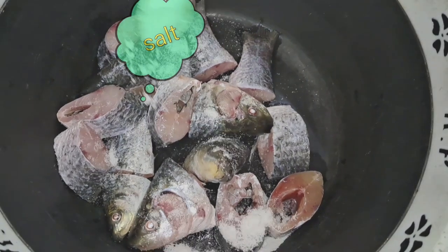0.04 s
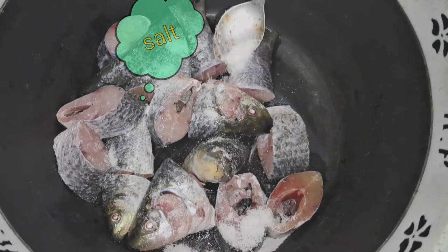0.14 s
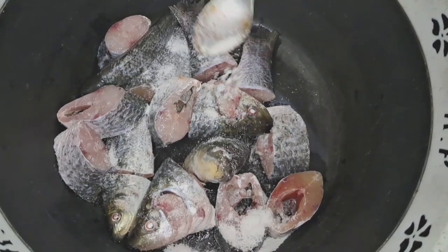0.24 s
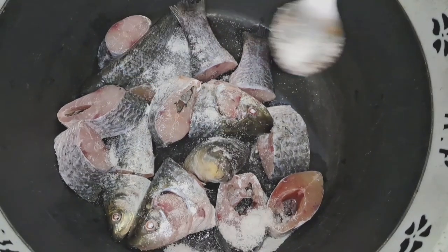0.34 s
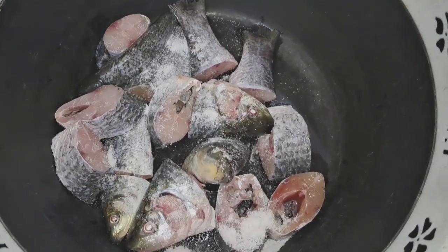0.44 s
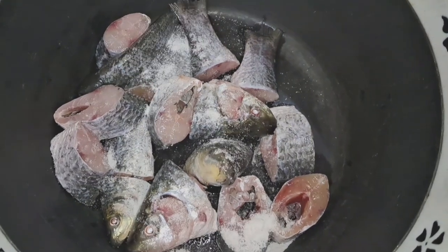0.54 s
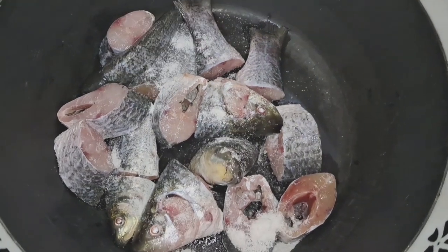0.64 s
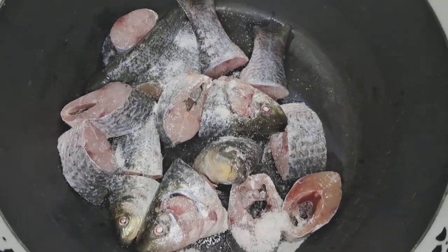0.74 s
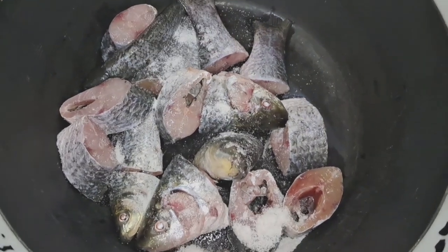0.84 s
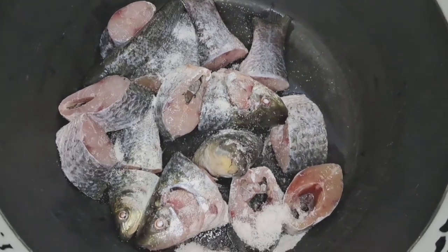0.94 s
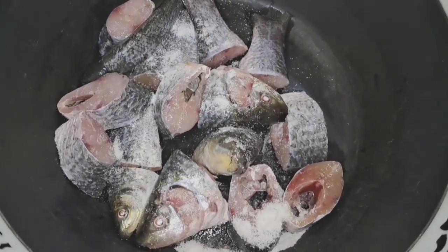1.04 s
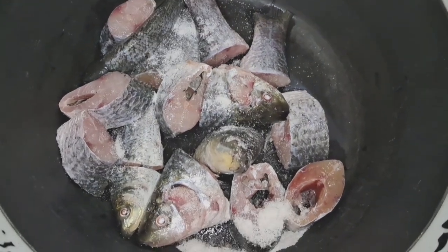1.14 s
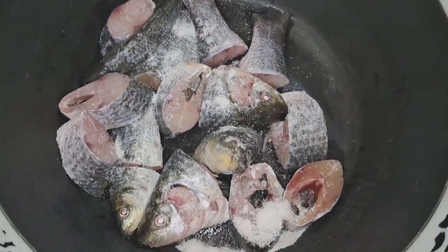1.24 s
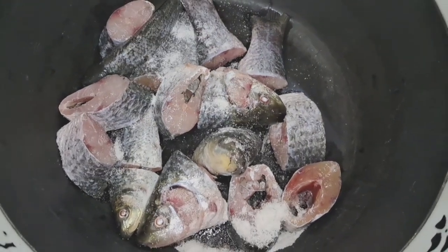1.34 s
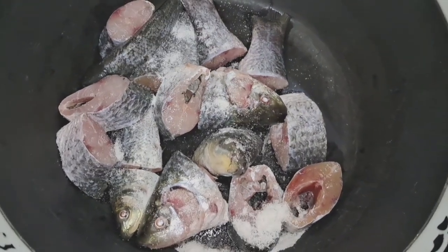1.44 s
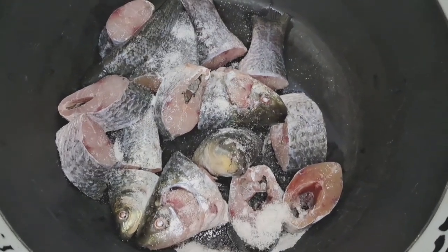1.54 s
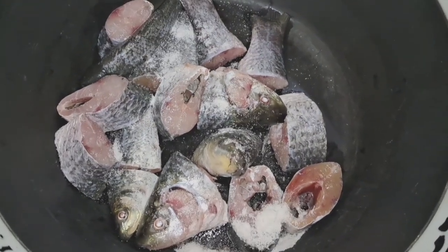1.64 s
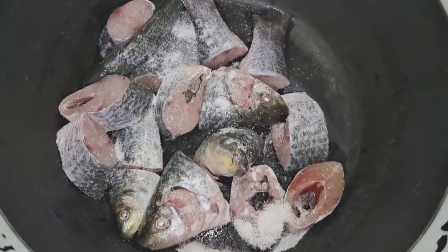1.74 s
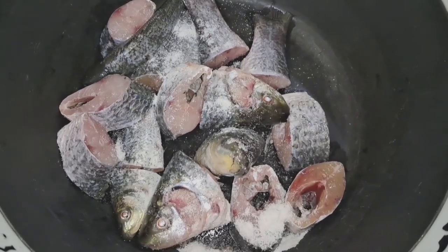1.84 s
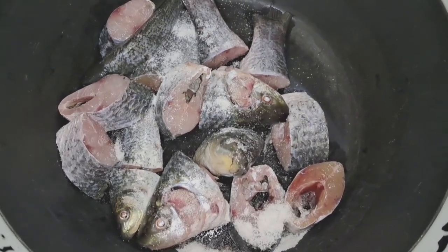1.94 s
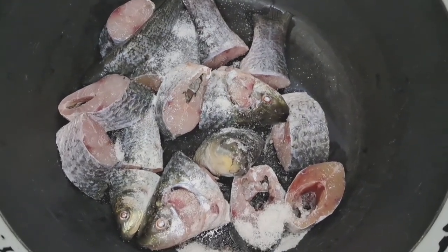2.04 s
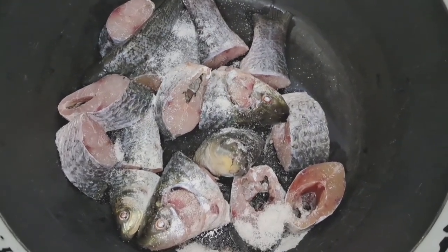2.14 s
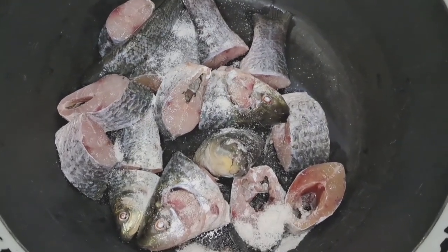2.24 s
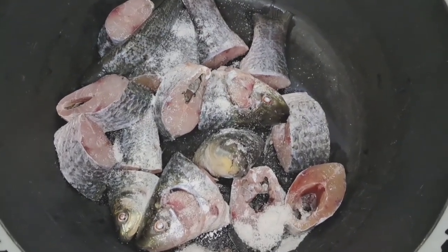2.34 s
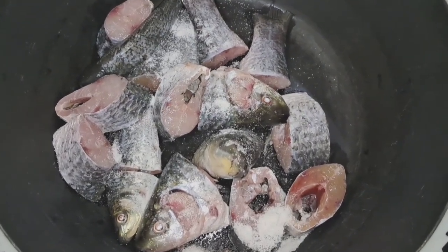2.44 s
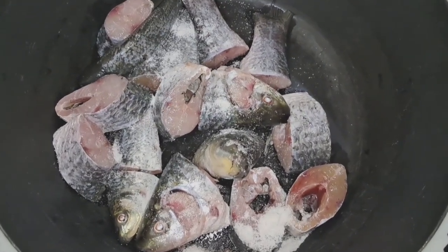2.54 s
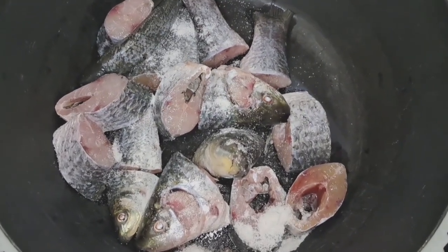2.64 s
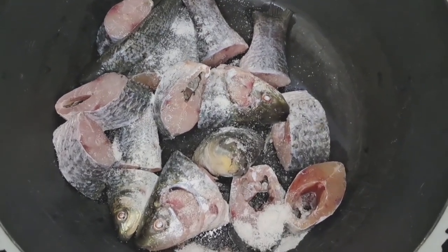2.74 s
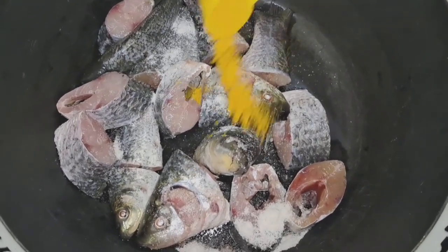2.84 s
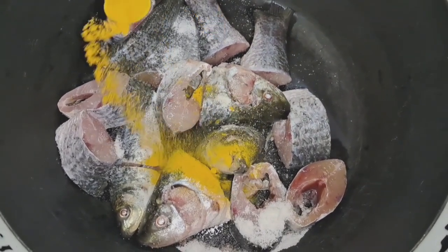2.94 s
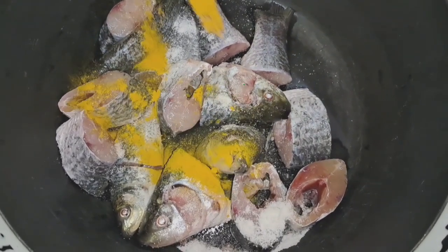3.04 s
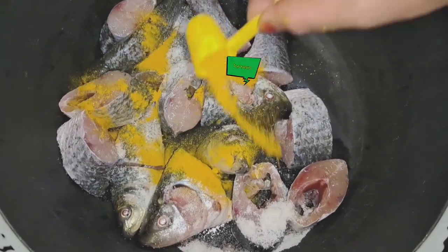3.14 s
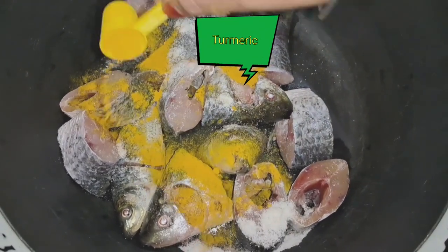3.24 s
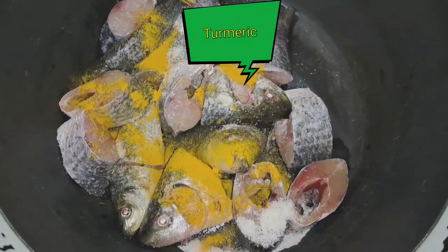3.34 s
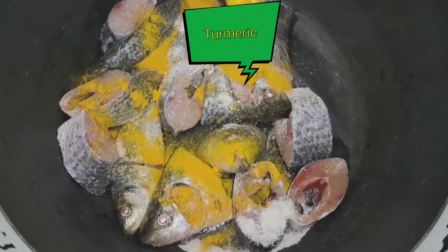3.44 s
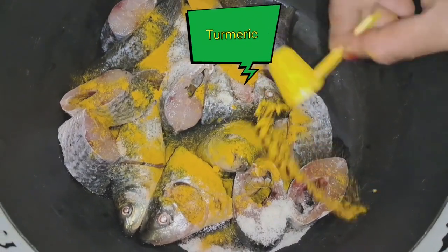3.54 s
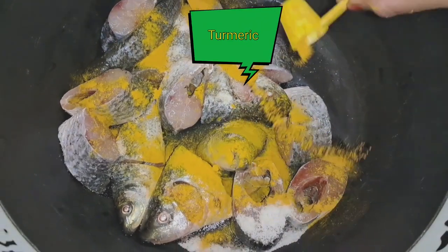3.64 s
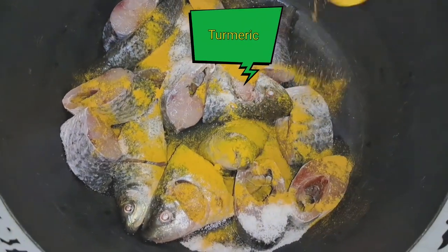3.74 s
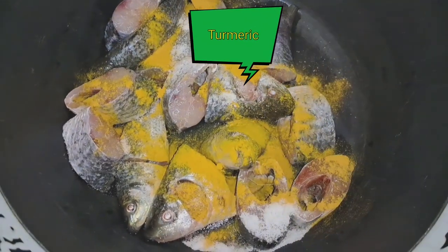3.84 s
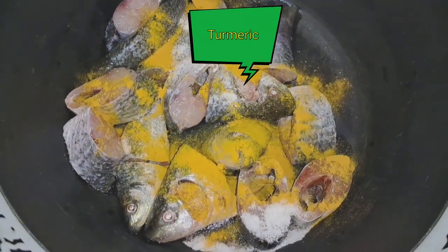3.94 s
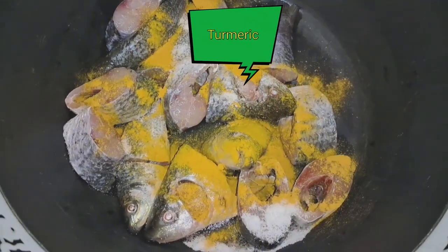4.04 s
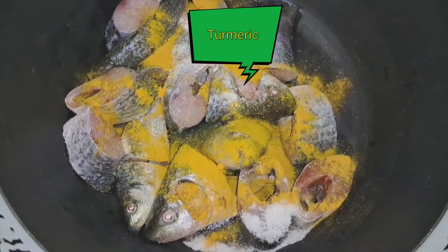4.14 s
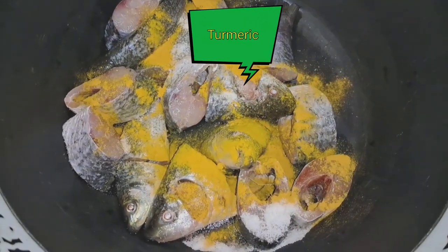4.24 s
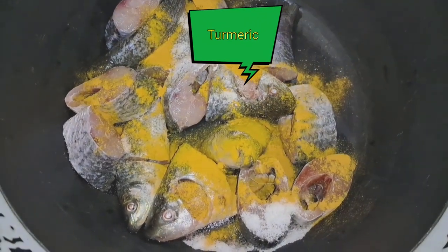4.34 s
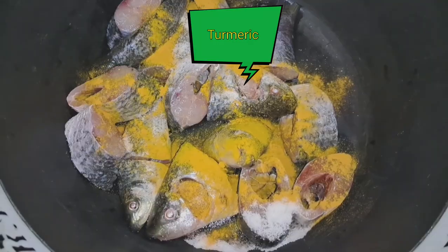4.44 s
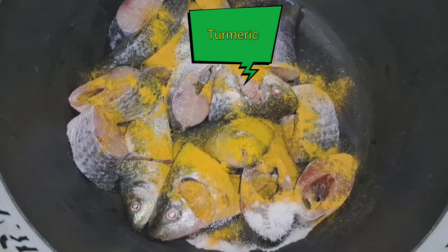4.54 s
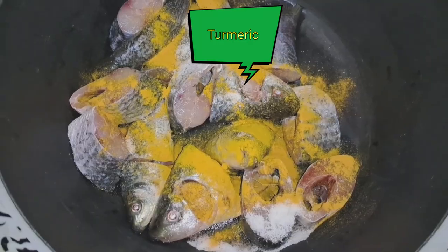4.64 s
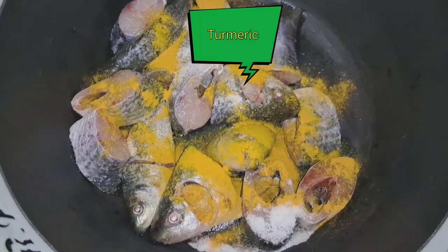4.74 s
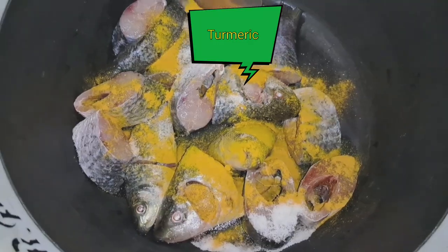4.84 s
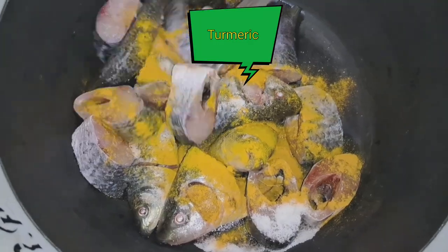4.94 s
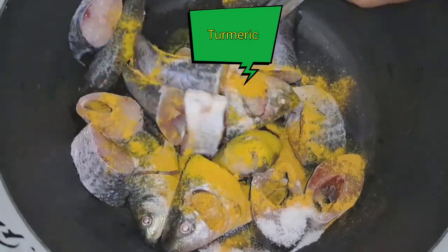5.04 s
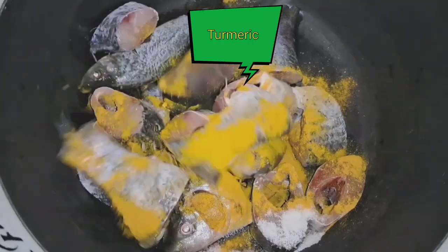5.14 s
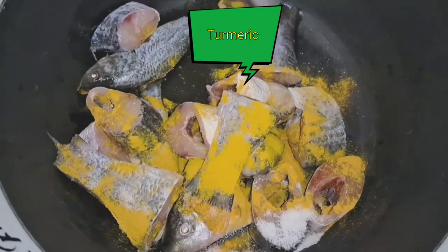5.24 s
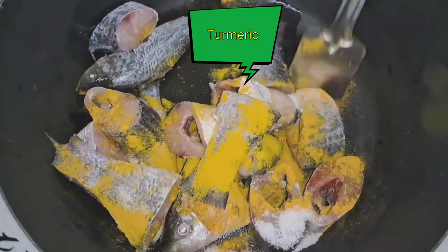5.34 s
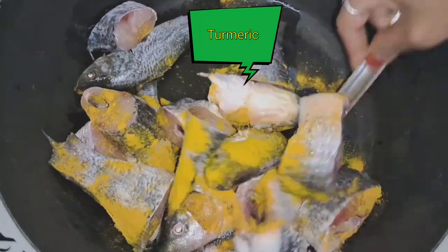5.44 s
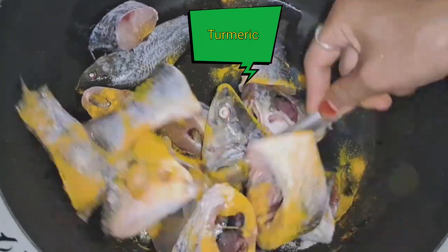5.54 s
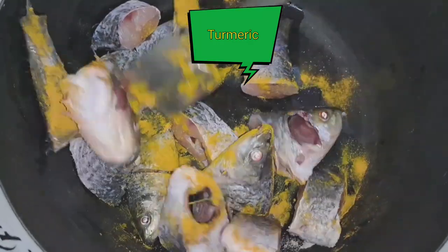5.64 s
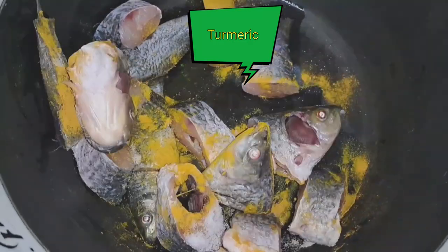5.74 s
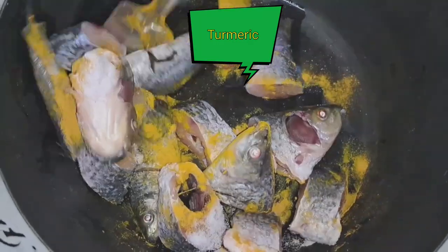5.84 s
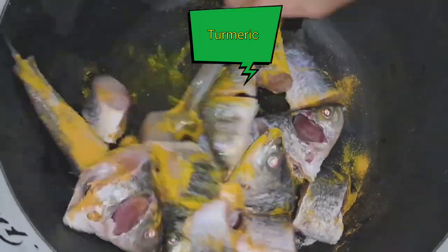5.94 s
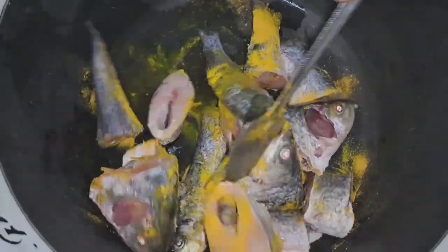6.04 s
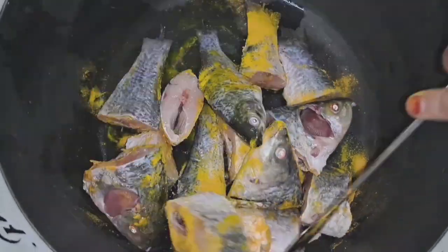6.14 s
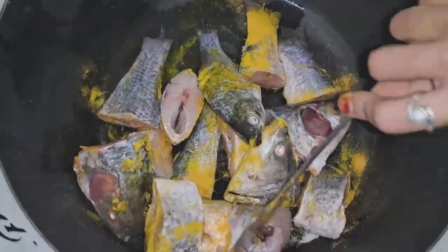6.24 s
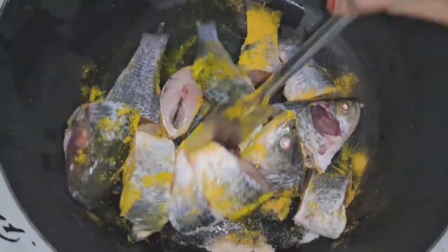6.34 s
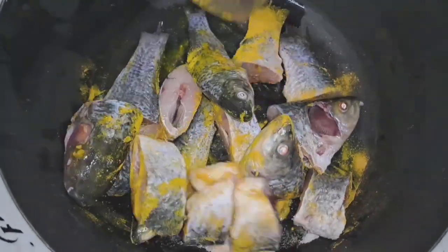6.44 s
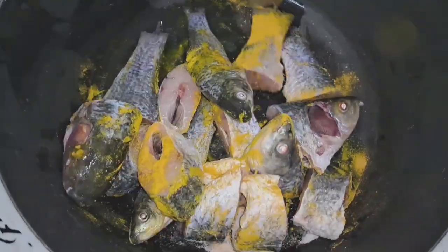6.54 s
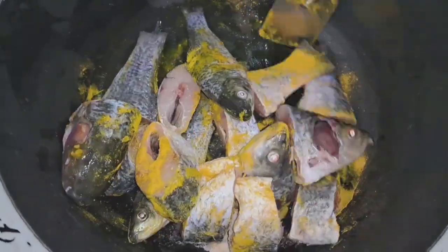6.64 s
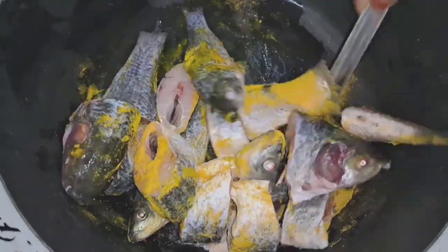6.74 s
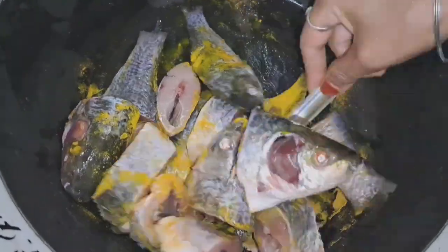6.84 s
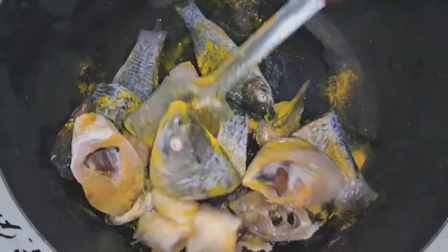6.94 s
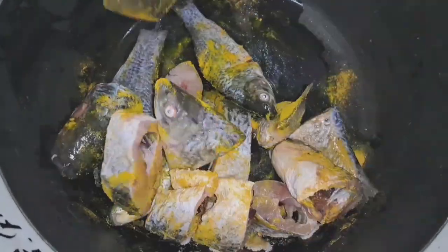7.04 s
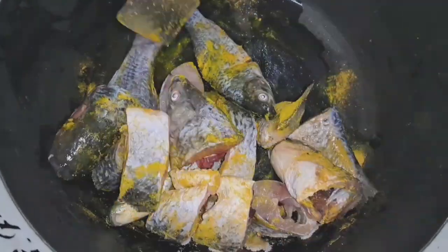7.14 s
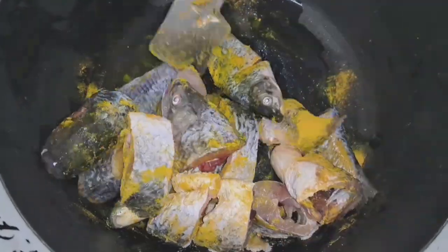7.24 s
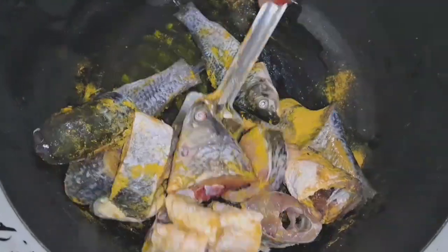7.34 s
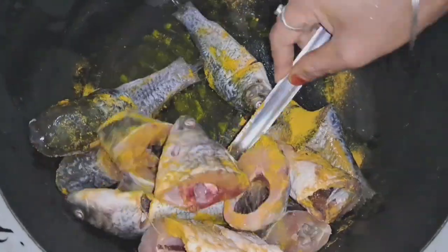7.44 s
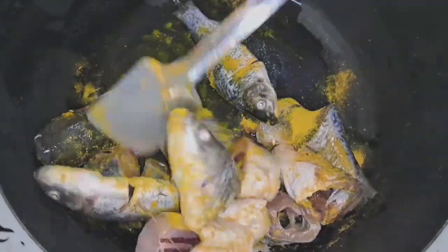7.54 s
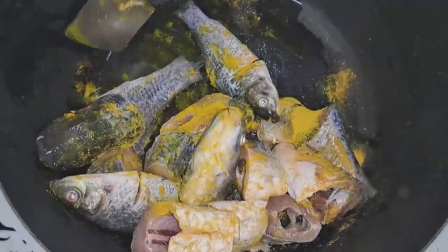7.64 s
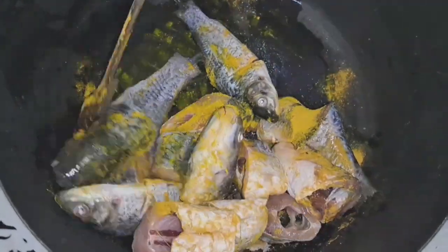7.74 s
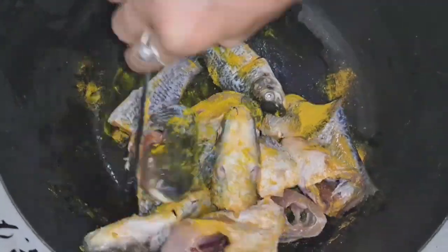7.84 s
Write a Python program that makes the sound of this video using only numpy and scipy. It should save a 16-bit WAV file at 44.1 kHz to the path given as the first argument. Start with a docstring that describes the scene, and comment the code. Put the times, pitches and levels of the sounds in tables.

```python
"""In a kitchen, close up: a metal spatula knocks and scrapes a wok while raw fish pieces flop in it.
Blows are a short dent plus ringing modes (a few are dull thumps of landing pieces), scrapes are random
catches that ring the same modes, short single tones are light touches and one low soft thump,
and dropped pieces are pitch-sagging thuds with wet slaps.
Behind them: steady shaped noise as hiss, thin wavering whistles, two brief spurts and sparse echoes."""
import sys
import numpy as np
from scipy import signal
from scipy.io import wavfile
from scipy.ndimage import uniform_filter1d

SR = 44100
rng = np.random.default_rng(int(sys.argv[2]) if len(sys.argv) > 2 else 0)


def output_pcm(signal):
    """Save a mono or channel-first signal as 16-bit PCM at the path in sys.argv[1].

    Samples are clipped to [-1, 1] before scaling.
    """
    pcm = np.clip(np.atleast_2d(signal).T, -1, 1) * 32767
    wavfile.write(sys.argv[1], SR, np.round(pcm).astype(np.int16))


N = 347985


def gain_of(db):
    """Decibels to amplitude."""
    return 10 ** (np.asarray(db) / 20)


def evened(x):
    """Scales to rms 1."""
    return x / np.sqrt(np.mean(x ** 2) + 1e-20)


def read(points, hz):
    """Reads a table on a log-frequency axis."""
    f, value = np.transpose(points)
    return np.interp(np.log(hz + 1), np.log(f + 1), value)


def add(mix, s, sound):
    """Mixes a two-channel sound in at time s."""
    part = mix[:, round(s * SR):][:, :sound.shape[1]]
    part += sound[:, :part.shape[1]]


def drift(length, rate):
    """Slow chance of rms 1 that changes about rate times a second."""
    knots = rng.standard_normal(int(length / SR * rate) + 2)
    return evened(np.interp(np.arange(length) * rate / SR, np.arange(len(knots)), knots))


# Left-right likeness of noise and echoes. Each row: frequency in Hz, likeness from 0 to 1
# before each sound's own factor.
PORT_LIKENESS = [(40, 0.12), (130, 0.21), (290, 1), (700, 0.91), (1400, 0.92), (2500, 0.093), (5000, 0.057),
                 (15000, 0.033)]


def noise(length, colour, lean, lag_s, patchy_db, likeness=0.95, bands=(), ripple_db=0, size=1024):
    """Two-port noise of rms 1: random short-time spectra in drifting patches, left port slightly early."""
    hz = np.fft.rfftfreq(size, 1 / SR)
    a, b, c, d, patches = rng.standard_normal((4 * length // size + 5, len(hz), 5)).T
    patches = uniform_filter1d(patches, size=size // 100, axis=0)
    patches = evened(uniform_filter1d(patches, size=10240 // size, axis=1))
    same = np.clip(likeness * read(PORT_LIKENESS, hz), 0, 1)[:, None]
    right = a + 1j * b
    early = np.exp(2j * np.pi * hz * lag_s)[:, None]
    left = same * early * right + np.sqrt(1 - same ** 2) * (c + 1j * d)
    z = np.array([left, right])
    side = read(lean, hz)[:, None] / 2
    shape_db = read(colour, hz)
    shape_db += sum(db / (1 + (2 * (hz - f) / width) ** 2) for f, width, db in bands)
    # standing waves of the room
    ripple = evened(uniform_filter1d(rng.standard_normal(len(hz)), size=2))
    shape_db += ripple_db * np.minimum(hz / 500, 1) * ripple
    z *= gain_of(shape_db[:, None] + patchy_db * patches + np.array([side, -side]))
    out = signal.istft(z, nperseg=size, noverlap=3 * size // 4)[1][:, :length]
    return out / np.sqrt(np.mean(out.mean(0) ** 2))


# Balance of the background noise. Each row: frequency in Hz, left over right in dB.
HISS_LEAN = [(60, -1), (120, 0), (240, -2.5), (480, -7), (950, -2), (1890, -1), (3770, -6), (7520, -9),
             (15000, 2)]
# Colour of the steady hiss. Each row: frequency in Hz, relative level in dB per Hz.
HISS_COLOUR = [(30, -27), (75, -28.5), (115, -15.5), (210, -17.5), (480, -12.5), (800, -7), (1150, -3.5),
               (1400, -7.5), (2300, -4), (2800, -6), (4600, -5.5), (7100, -9), (7700, -4), (8600, -14.5),
               (15500, -12)]
# Narrow bands that stand out of the hiss. Each row: centre in Hz, width in Hz, boost in dB.
HISS_BANDS = [(259.6, 34, 9.5), (339.5, 23, 10), (598, 19, 5), (804, 40, 6.5), (953, 70, 4), (1147, 36, 4),
              (1314, 16, 5.5), (1770, 27, 5.5), (2220, 91, 3.5), (2420, 100, 3.5), (3480, 120, 3)]
HISS_DB, HISS_LAG_S = -47, 1.5e-4  # the source stands to the left


def hiss():
    """Steady broadband noise with fixed narrow bands and a slight slow swell."""
    bed = noise(N, HISS_COLOUR, HISS_LEAN, HISS_LAG_S, patchy_db=1.0, bands=HISS_BANDS,
                ripple_db=1.5, size=4096)
    swell_db = .3 * drift(N, 4)
    return gain_of(HISS_DB + swell_db) * bed


# Comb of thin whistles. Each row: centre frequency in Hz, level in dB before the port boosts.
WHISTLES = [(7149, -73), (7262, -68), (7381, -73), (7494, -66), (7612, -66), (7730, -69), (7827, -67),
            (7940, -69), (8430, -79)]


def whistles():
    """Sines that waver in pitch and level, each stronger on the right."""
    out = np.zeros((2, N))
    for hz, db in WHISTLES:
        turns = np.cumsum(hz + 4 * drift(N, 14)) / SR
        slip = np.array([.12 * drift(N, 5), np.zeros(N)])  # the ports slip in and out of step
        level_db = db + 3 * drift(N, 9) + np.array([[1], [7]])
        out += gain_of(level_db) * np.sin(2 * np.pi * (turns + rng.random() + slip))
    return out


# Brief swells of hiss. Each row: time of the top in seconds, level in dB, rise time constant in seconds,
# t60 in seconds, then a colour of frequency in Hz and relative level in dB per Hz.
SPURTS = [(2.17, -47, 0.068, 0.95, [(2500, -18), (5000, -4), (7000, 2), (9500, -8), (13500, -3),
          (15500, -4)]), (4.305, -38.5, 0.006, 0.36, [(2500, -25), (4700, 6), (7000, -6), (9500, -12),
          (13000, -7), (15200, 4)])]


def spurts():
    """Bursts of coloured noise with an exponential rise and fall."""
    out = np.zeros((2, N))
    for s, db, rise, t60, colour in SPURTS:
        u = np.arange(SR) / SR - 4 * rise
        swell = np.where(u < 0, np.exp(u / rise), gain_of(-60 * u / t60))
        puff = noise(SR, colour, HISS_LEAN, HISS_LAG_S, patchy_db=2)
        add(out, s - 4 * rise, gain_of(db) * swell * puff)
    return out


# How long the kitchen echoes. Each row: frequency in Hz, t60 in seconds.
KITCHEN_DECAY = [(100, 0.08), (600, 0.66), (3000, 0.47), (15000, 0.25)]


def kitchen(x):
    """Sparse echoes of random sign, each band dying at its own speed."""
    taps = np.zeros((2, SR // 2))
    at = np.arange(150, SR // 2 - 20, 20) + rng.integers(0, 20, (2, (SR // 2 - 151) // 20))
    np.put_along_axis(taps, at, rng.choice([-1., 1.], at.shape), 1)
    hz, t, z = signal.stft(taps, SR, nperseg=256)
    same = np.clip(read(PORT_LIKENESS, hz), 0, 1)[:, None]
    # echoes around 300 to 1400 Hz are most alike at both ports
    z[0] = same * z[1] + np.sqrt(1 - same ** 2) * z[0]
    decay = gain_of(-60 * t / read(KITCHEN_DECAY, hz)[:, None])
    tail = signal.istft(z * decay, SR, nperseg=256)[1]
    return signal.fftconvolve(x.mean(0)[None], tail / np.linalg.norm(tail[0]), axes=1)[:, :N]


# Balance of the wok sounds. Each row: frequency in Hz, left over right in dB.
WOK_LEAN = [(60, 0), (130, 0), (290, 1.5), (640, -4.5), (1410, 0), (3100, -2), (6820, -8), (15000, 2)]


def ring(hz, db, t60, lag_s):
    """One decaying mode at both ports; lag_s is how much later the right port gets it."""
    t = np.maximum(np.arange(6000) / SR - np.array([[max(-lag_s, 0)], [max(lag_s, 0)]]), 0)
    side = read(WOK_LEAN, hz) / 2
    return gain_of(db + np.array([[side], [-side]]) - 60 * t / t60) * np.sin(2 * np.pi * hz * t)


def dent(hz, db, width, delay):
    """A short bell-shaped wiggle; the left port gets it slightly first."""
    t = np.arange(6000) / SR - delay - np.array([[0], [4e-5]])
    side = read(WOK_LEAN, hz) / 2
    bell = np.exp(-(t / width) ** 2)
    return gain_of(db + np.array([[side], [-side]])) * bell * np.cos(2 * np.pi * hz * t)


def burst(colour, delay, t60):
    """A puff of coloured noise that starts at once after its delay and dies fast."""
    t = np.arange(6000) / SR - delay
    puff = noise(6000, colour, WOK_LEAN, 6e-5, patchy_db=2, size=256)
    return (t > 0) * gain_of(-60 * np.maximum(t, 0) / t60) * puff


# Colour of wet fish sliding. Each row: frequency in Hz, relative level in dB per Hz.
SLIDE_COLOUR = [(40, -36), (90, -23), (160, -19), (260, -22), (380, -17), (600, -58)]


def sliding(length):
    """Lumpy low rub of wet fish on the metal."""
    lumps = gain_of(2.8 * drift(length, 48.0))
    return lumps * noise(length, SLIDE_COLOUR, WOK_LEAN, 8e-5, patchy_db=9.5, likeness=3.2)


# Soft pieces dropping on the metal. Each row: start in seconds, level in dB,
# pitch it sags to in Hz, cycles that set the length of the push.
THUDS = [(4.938, -46, 230, 1.8), (5.099, -49, 245, 2.2), (5.205, -46.5, 258, 2.3),
         (5.292, -38.5, 274, 0.79), (5.325, -48, 406, 2.1), (5.506, -51, 306, 3.3), (5.548, -40, 247, 2.1),
         (5.57, -39, 336, 1.7), (5.652, -36.5, 240, 0.73), (5.721, -35.5, 275, 0.86),
         (5.769, -47, 170, 1.7), (5.97, -35, 240, 1.6), (6.01, -36, 260, 1.1), (6.088, -56, 251, 3.2),
         (6.127, -49, 200, 1.05), (6.627, -56, 250, 4.5), (6.719, -33.5, 268, 1.37), (6.836, -41, 276, 1.6),
         (6.888, -35, 154, 0.93), (6.953, -34, 180, 1), (6.98, -42, 240, 1.4), (7.001, -32.5, 248, 1.8),
         (7.021, -44, 300, 1.1), (7.394, -56, 250, 1.8), (7.157, -33, 302, 2.64), (7.185, -38, 328, 2.8),
         (7.602, -38.5, 270, 1.12), (7.63, -48, 282, 2.3), (7.735, -31, 330, 1.96), (7.786, -47, 274, 4.3),
         (7.879, -42, 322, 2.9)]
# Colour of wet slaps and of the body of a blow. Each row: frequency in Hz, relative level in dB per Hz.
SLAP_COLOUR = [(150, -20), (400, 0), (750, -3), (1500, -10), (4000, -23)]
SLAP_DB, SLAP_T60 = -10.5, 0.072  # dB relative to the thud's level, seconds
SETTLE_DB, SETTLE_T60 = -15, 0.14  # the piece slides on a little: dB relative to the thud, seconds


def thuds():
    """A wet piece lands: a few cycles that sag in pitch as the contact spreads, a slap, a short slide."""
    out = np.zeros((2, N))
    t = np.arange(SR // 4) / SR
    for s, db, hz, cycles in THUDS:
        u = t * hz / max(cycles, .5)
        turns = cycles * (u + 0.37 * (1 - np.exp(-7. * u)))
        push = u * np.exp(1 - 2.7 * u) * 5.06 * np.sin(2 * np.pi * turns)
        settle = np.minimum(u, 1) * gain_of(SETTLE_DB - 60 * t / SETTLE_T60) * sliding(len(t))
        add(out, s, gain_of(db) * (np.array([0.82 * push, 0.9 * push]) + settle))
        add(out, s, gain_of(db + SLAP_DB) * burst(SLAP_COLOUR, 0.00092, SLAP_T60))
    return out


# Short single tones: light touches on the metal, and one low soft thump at 0.527 s.
# Each row: start in seconds, level in dB, frequency in Hz, t60 in seconds.
PINGS = [(0.527, -45, 170, 0.028), (4.82, -32, 2170, 0.074), (4.859, -26, 1450, 0.038),
         (5.059, -32.5, 1450, 0.077), (5.325, -33.5, 1450, 0.031), (5.497, -29, 1490, 0.046),
         (5.498, -30, 1880, .04), (5.603, -32, 1750, .04), (5.571, -38, 500, .04), (5.9, -29, 2780, 0.05),
         (5.608, -39, 1300, .05), (5.646, -40, 2950, 0.046), (6.627, -33, 2670, 0.037),
         (6.629, -36, 1770, .05), (6.702, -34, 2560, .06), (6.72, -31, 6150, 0.087),
         (6.833, -34, 2140, 0.034), (6.589, -32, 1880, 0.062), (6.719, -33, 2700, .05),
         (6.858, -32.5, 1560, 0.036), (6.857, -31, 2070, 0.035), (6.976, -33.5, 2280, .04),
         (7.179, -30, 600, 0.054), (7.19, -38, 3100, 0.074), (7.21, -32, 2930, 0.066),
         (7.228, -32.5, 1474, 0.037), (7.327, -25, 2470, .018), (7.397, -39, 650, 0.044),
         (7.336, -29, 2050, 0.039), (7.335, -27, 3027, .06), (7.365, -34, 2650, .05),
         (7.444, -26.5, 1670, 0.033), (7.626, -32, 1470, 0.03), (7.777, -33, 2300, .04),
         (7.781, -30, 716, 0.051), (7.794, -36, 2250, .05), (7.82, -35, 3260, 0.045),
         (7.838, -37, 1590, 0.087), (7.864, -39, 3450, .08), (7.878, -34, 2700, 0.063),
         (7.879, -39, 3500, .08)]
PING_RISE_S = 0.0012


def pings():
    """One decaying tone each, with a soft start."""
    out = np.zeros((2, N))
    soft_start = 1 - np.exp(-(np.arange(6000) / SR / PING_RISE_S) ** 2)
    for s, db, hz, t60 in PINGS:
        add(out, s, soft_start * ring(hz, db, t60, 6e-5))
    return out


# Blade dragged over the metal. Each row: start in seconds, rise in seconds, hold in seconds, level in dB,
# then bowl boom, gritty hiss and rasp in dB relative to that before the mix trims,
# bowl tone in Hz, blade tone in Hz.
SCRAPES = [(4.813, 0.0041, 0.28, -41, -4, -4, -6, 800, 2300),
           (5.036, 0.026, 0.0093, -40, -9.5, -2, -4, 680, 1700),
           (5.41, 0.0038, 0.2, -39.5, -16, -4, -7, 740, 3040),
           (5.84, 0.0049, 0.16, -41.5, -26, -2, -1.5, 770, 2580),
           (6.077, 0.027, 0.023, -52, -4, -8, -6, 700, 1950),
           (6.571, 0.004, 0.078, -45.5, 4, -5.5, -9, 630, 1950),
           (6.699, 0.032, 0.014, -42, -4, -5.5, -10, 597, 2500),
           (6.763, 0.0025, 0.099, -40.5, -2, -5, -6.5, 730, 2800),
           (6.943, 0.048, 0.013, -45, 2.5, -10, -17, 490, 1960),
           (7.156, .005, 0.067, -41, 0, -15, -5, 503, 2900),
           (7.274, 0.067, 0.017, -38.5, -12, -12.5, 1, 600, 2550),
           (7.37, 0.017, 0.076, -51.5, 1, 2, -12, 640, 2200),
           (7.595, 0.026, 0.013, -48.5, 5, -9, -12, 442, 1700),
           (7.736, 0.0027, 0.075, -42.5, 4.5, -4.5, -4.5, 666, 2220),
           (7.83, 0.049, .03, -37, -11, -10.5, -14, 400, 3260)]
# Modes of bowl, blade and blade edge, before chance detuning.
# Each row: frequency in Hz, relative level in dB, t60 in seconds (a little shorter in scrapes).
BOWL_MODES = [(297, -29, 0.096), (430, -1, 0.05), (477, 15.5, 0.053), (519, 4.5, 0.077), (594, 0, 0.12),
              (630, 7.5, 0.25), (669.4, 4.5, 0.28), (760, 6, 0.09), (807, 8, 0.08), (370, -2, 0.08),
              (901, 5, 0.07), (970, 12, 0.026), (1100, 4, 0.04)]
BLADE_MODES = [(1204, -26, 0.16), (1500, 8, 0.033), (1634, -1, 0.053), (1827, 6, 0.019), (2147, 2.5, 0.032),
               (2350, -17, 0.013), (2583, 2, 0.024), (3050, -11.5, 0.12), (3330, 2, 0.017)]
EDGE_MODES = [(3900, 7, 0.025), (4500, 4, 0.02), (5200, 6, 0.018), (6200, 5, 0.023), (7100, 3, 0.018),
              (8500, 5, 0.014), (10000, 2, 0.012), (12500, 3, 0.01)]
# Colour of gritty metal hiss. Each row: frequency in Hz, relative level in dB per Hz.
GRIT_COLOUR = [(1200, -8), (2500, 2.5), (3600, 0.5), (5000, -1.5), (7200, -2.5), (9000, -7), (13800, -8),
               (15500, -16)]
# A salt crystal cracking. Each row: frequency in Hz, relative level in dB, pulse width in seconds.
SNAP_PULSES = [(3000, -5, .0003), (6000, 2, 0.00017), (11000, -4, .0001)]
SNAP_DB, SLIDE_DB = -6.5, -24  # cracks relative to the grit setting; fish pushed along under the drag
SAG_DB_PER_S, RELEASE_T60 = 33.5, 0.26  # the drag eases while held, then dies (seconds)
JUDDER_DB, EDGE_TONE_HZ = 2.2, 6200  # uneven drag; strongest tone of the edge


def catching(length, per_s, spread_db, most):
    """Catches at random instants, about per_s a second, of random strength."""
    strength = gain_of(spread_db * np.minimum(rng.exponential(1, length), most))
    return strength * (rng.random(length) < per_s / SR)


def dragged_modes(catches, modes, tone_hz):
    """Each catch rings the modes under the moving contact, favouring those near tone_hz."""
    length = len(catches)
    group = 0
    for hz, level, t60 in modes:
        favour_db = 8.8 * np.exp(-(np.log(hz / tone_hz) / 0.24) ** 2)
        drive = catches * gain_of(6.5 * drift(length, 27.0) + favour_db)
        bent_hz = hz * (1 + 0.025 * rng.standard_normal())
        lag_s = 8e-5 + 0.000081 * rng.standard_normal()
        mode = ring(bent_hz, level, 0.92 * t60, lag_s)
        group = group + signal.oaconvolve(drive[None], mode, axes=1)[:, :length]
    return evened(group)


def stroke(start, rise, hold, db, bowl_db, grit_db, rasp_db, bowl_hz, blade_hz):
    """The dragged blade catches on grains of salt and spice, rings the metal, hisses, rasps and cracks."""
    t = np.arange(SR // 2) / SR
    length = len(t)
    held = np.clip(t - rise, 0, hold)
    released = np.maximum(t - rise - hold, 0)
    drag_db = db - SAG_DB_PER_S * held - 60 * released / RELEASE_T60
    drag = np.minimum(t / rise, 1) ** 0.68 * gain_of(drag_db)

    catches = catching(length, 4000, 3.3, 5) * rng.choice([-1., 1.], length)
    out = gain_of(bowl_db - 4.5) * dragged_modes(catches, BOWL_MODES, bowl_hz)
    out += gain_of(-1.5) * dragged_modes(catches, BLADE_MODES, blade_hz)
    out += gain_of(grit_db - 28) * dragged_modes(catches, EDGE_MODES, EDGE_TONE_HZ)

    # the hiss flares where catches bunch up
    bite = evened(uniform_filter1d(abs(catches), size=30) + 0.17) * gain_of(JUDDER_DB * drift(length, 89.0))
    grit = noise(length, GRIT_COLOUR, WOK_LEAN, 8e-5, patchy_db=1.2)
    # the blade rasps about its tone
    band = [(blade_hz / 3.1, -25), (blade_hz / 1.23, -3), (blade_hz, 0),
            (blade_hz * 1.34, -4), (blade_hz * 3.5, -25)]
    rasp = noise(length, band, WOK_LEAN, 8e-5, patchy_db=2.5, size=512)
    out += gain_of(rasp_db) * bite * rasp
    out += gain_of(grit_db + 5.0) * bite * grit
    out += gain_of(SLIDE_DB) * sliding(length)

    coarse = catching(length, 350, 4.5, 4)  # larger salt crystals crack
    snap = sum(dent(hz, level, width, 0.001035) for hz, level, width in SNAP_PULSES)[:, :200]
    cracks = evened(signal.oaconvolve(coarse[None], snap, axes=1)[:, :length])
    out += gain_of(grit_db + SNAP_DB) * cracks
    return start, drag * out


# Hard blows on the wok, and a few dull, barely ringing thumps of landing pieces.
# Each row: start in seconds, blade level in dB, bowl boom in dB relative to the blade,
# edge tick in dB relative to the blade, blade ring in dB relative to the dent, strongest blade tone in Hz,
# bowl ring in dB relative to the dent, strongest bowl tone in Hz.
KNOCKS = [(0.5277, -43.5, 7.5, -10, -26, 1100, -24, 900), (4.812, -13.5, -0.5, -9, -14, 2200, -6, 626),
          (4.8611, -21.5, -7, -4, -6, 1400, -1.5, 910), (4.9914, -29.5, -0.5, 0, -1, 1490, -8, 770),
          (5.0436, -36, -1.5, -14, -4, 1500, 4.5, 705), (5.229, -27.5, -0.5, -15, -10, 1420, -11, 710),
          (5.4098, -19.5, -3.5, -2, -6, 1400, -9, 760), (5.431, -35, -12, 12.5, -2, 1570, -4, 760),
          (5.5078, -31, -2, -6, -2, 2650, -1.5, 765), (5.5477, -40, 5, 8, 5, 1450, 2.5, 534),
          (5.574, -37, 0, 7, -6, 1500, -4, 600), (5.8148, -33.5, -1, 1, 2.5, 1700, -1.5, 760),
          (5.8371, -18, -32, -5, -2, 2330, 2.5, 770), (5.8388, -23, -10, -4.5, -4, 2480, -9, 770),
          (5.8403, -23.5, -27, -6, -8, 1590, -10, 770), (5.903, -26, -33, -5, -2, 2800, 4, 770),
          (6.565, -13, -1, -10, -7, 2250, -7.5, 640), (6.7203, -24, -14, -3, -5.5, 1530, -11, 600),
          (6.7662, -20, -6, -4.5, -9, 1690, -8.5, 734), (6.77, -21.5, -20, 0, -7, 2200, -9, 720),
          (6.833, -20, -8, -24, -16, 1800, -18, 724), (6.9498, -33, 3, -10, -24, 2160, -22, 490),
          (7.001, -25.5, 0, -8, -23, 1800, -26, 490), (7.1567, -15.5, -1.5, -8.5, -7.5, 2200, -17.5, 600),
          (7.3351, -16.5, -15, -10, -13, 2100, -11, 715), (7.3378, -18, -10, -16, -2, 1490, -8, 720),
          (7.3976, -29, -2.5, 7.5, -19, 2180, -14, 640), (7.7341, -20.5, -6, -12, 1, 2130, -6.5, 520),
          (7.774, -40, -10, 12, -12, 2300, -12, 700), (7.878, -38, -6, 8, -10, 2700, -10, 503)]
# First dent of a blow, one list each for bowl, blade and edge.
# Each row: frequency in Hz, relative level in dB, pulse width in seconds, delay in seconds.
DENTS = [
    [(633, -0.5, 0.0012, 0.0016), (1000, -5, 0.0006, 0.0013)],
    [(2530, -0.5, 0.00024, 0.001105)],
    [(4050, -7.5, 0.00018, 0.000768), (6500, -3, 0.00017, 0.000898), (12500, -12, 0.0003, 0.00086)],
]
DETUNE, KNOCK_PAN_DB = .007, 2  # each mode is detuned slightly by chance at every blow; left over right
CHATTER_DB, CHATTER_T60 = -3.5, 0.011  # the blade edge rattles: dB relative to the tick, seconds
BODY_DB, BODY_T60 = -9, .15  # dull noisy body of the blow: dB relative to the bowl ring, seconds


def knock_tail(modes, bowl_hz, blade_hz):
    """All modes of one part ring together; where the blow lands favours some of them."""
    favoured = (bowl_hz, 8, .16), (blade_hz, 5.7, .049), (EDGE_TONE_HZ, 4.5, .049)
    tail = 0
    for hz, level, t60 in modes:
        chance, lag, bend = rng.standard_normal(3)
        favour_db = max(top_db * np.exp(-(np.log(hz / tone_hz) / spread) ** 2)
                        for tone_hz, top_db, spread in favoured)
        mode = ring(hz * (1 + DETUNE * bend), level + favour_db + 2. * chance, t60, 6e-5 + 1e-4 * lag)
        tail = tail + mode * gain_of(5 * drift(6000, 90.0))  # each mode dies away unevenly
    build = 1 - np.exp(-(np.arange(6000) / SR / .003) ** 2)  # builds while the dent spreads
    return tail * build / abs(tail[:, 130:]).max()


def knocks():
    """Each blow is a dent and then a ring of all modes, with edge chatter and a dull noisy body."""
    out = np.zeros((2, N))
    for s, db, bowl_db, edge_db, ring_db, blade_hz, boom_db, bowl_hz in KNOCKS:
        blow = gain_of(db) * dent(blade_hz, -1.0, 0.00097, 0.001334)
        blow += gain_of(db + edge_db + CHATTER_DB) * burst(GRIT_COLOUR, 0.00055, CHATTER_T60)
        blow += gain_of(db + bowl_db + boom_db + BODY_DB) * burst(SLAP_COLOUR, .003, BODY_T60)
        blow += gain_of(db + bowl_db) * dent(1070, -7.0, 0.00023, 0.001)
        parts = zip((BOWL_MODES, BLADE_MODES, EDGE_MODES), DENTS,
                    (bowl_db, 0, edge_db), (boom_db, ring_db, ring_db + 3.0))
        for modes, dents, group_db, tail_db in parts:
            first = sum(dent(*row) for row in dents)
            tail = gain_of(tail_db) * knock_tail(modes, bowl_hz, blade_hz)
            blow += gain_of(db + group_db) * (first + tail)
        add(out, s, blow * gain_of([[KNOCK_PAN_DB / 2], [-KNOCK_PAN_DB / 2]]))
    return out


def scene():
    """Wok sounds, their echoes and the background."""
    background = hiss() + whistles() + spurts()
    wok = thuds() + knocks()
    for row in SCRAPES:
        add(wok, *stroke(*row))
    # a small bowl radiates no deep bass
    wok = signal.sosfilt(signal.butter(3, 130., "high", fs=SR, output="sos"), wok)
    touches = pings()
    echoes = gain_of(-9.5) * kitchen(wok + gain_of(-4.0) * touches)
    return background + echoes + touches + wok


LOPSIDED, BAND_LIMIT_HZ = 0.15, 15350  # share of the squared signal; top of the band


def record(dry):
    """The microphone bends loud peaks slightly to one side; then the band limit."""
    low_pass = signal.firwin(511, BAND_LIMIT_HZ, window=("kaiser", 9), fs=SR)
    return signal.oaconvolve(dry + LOPSIDED * dry ** 2, low_pass[None], "same")


dry = scene()
out = record(dry)
output_pcm(out)
```